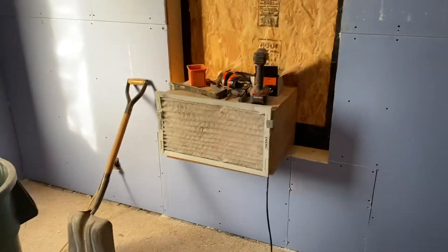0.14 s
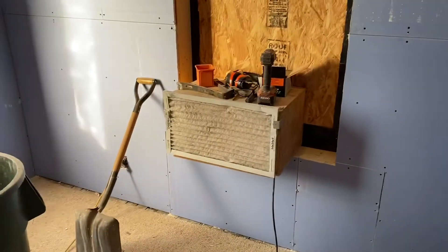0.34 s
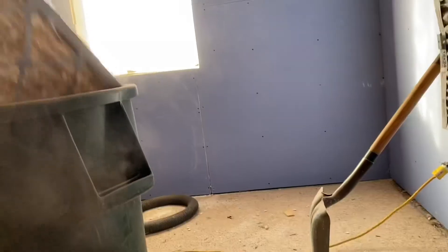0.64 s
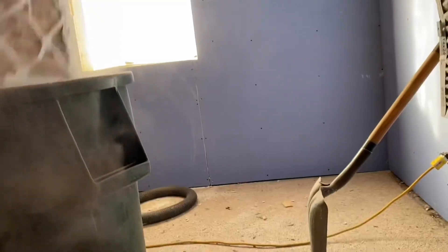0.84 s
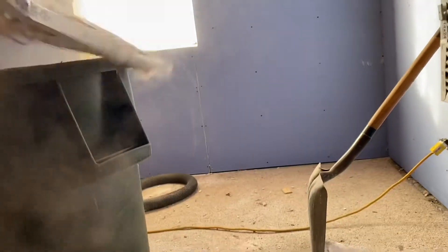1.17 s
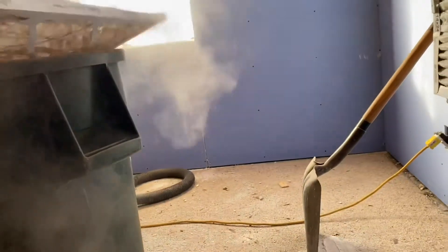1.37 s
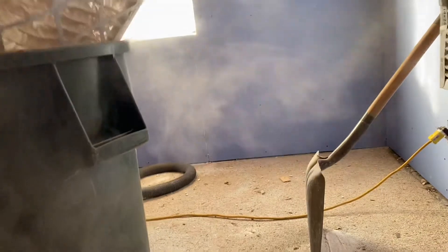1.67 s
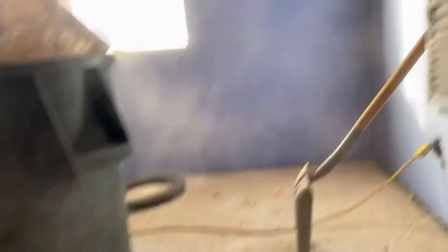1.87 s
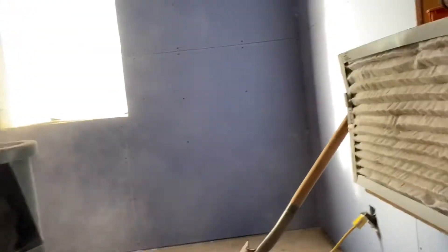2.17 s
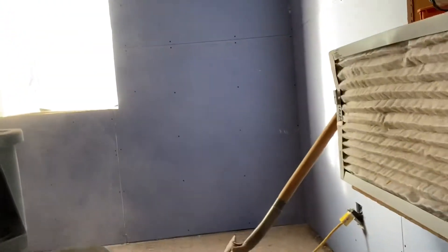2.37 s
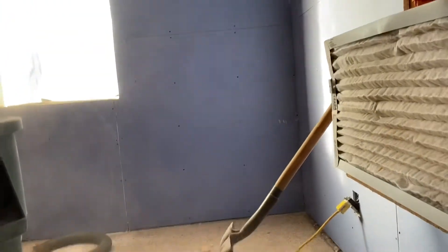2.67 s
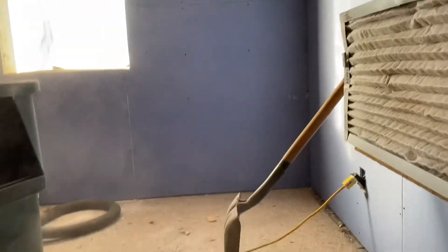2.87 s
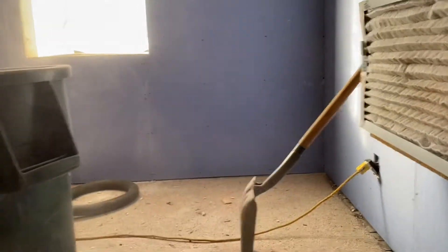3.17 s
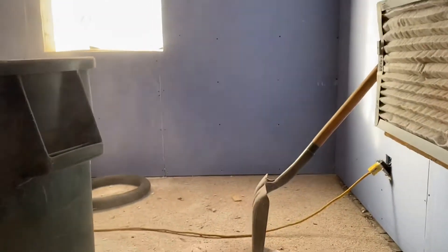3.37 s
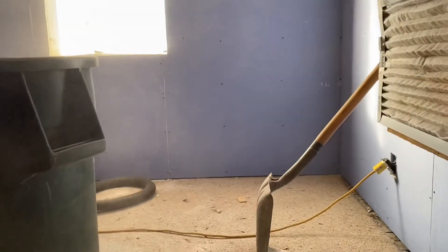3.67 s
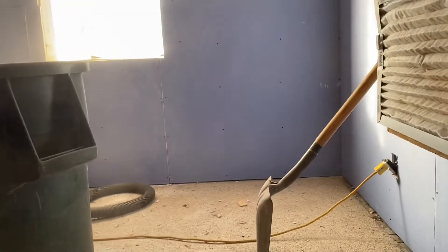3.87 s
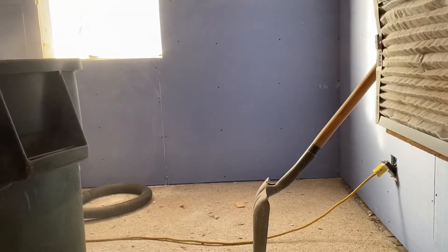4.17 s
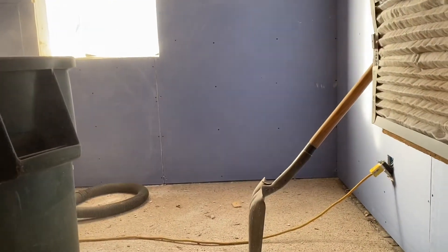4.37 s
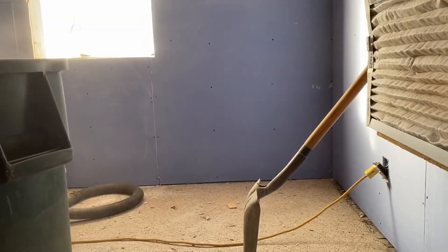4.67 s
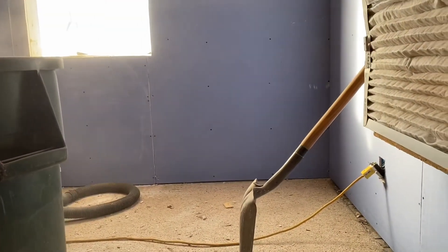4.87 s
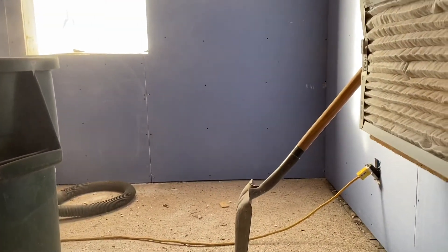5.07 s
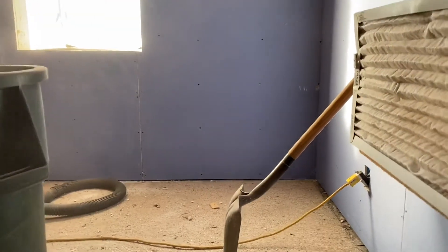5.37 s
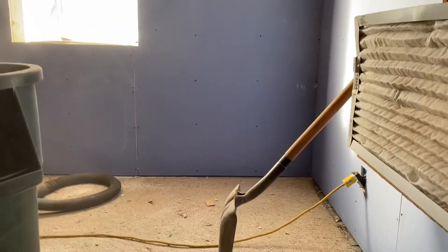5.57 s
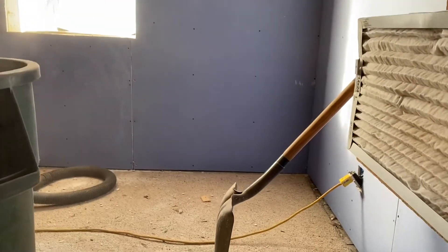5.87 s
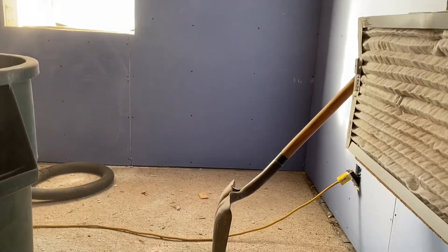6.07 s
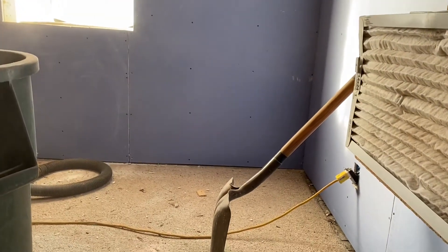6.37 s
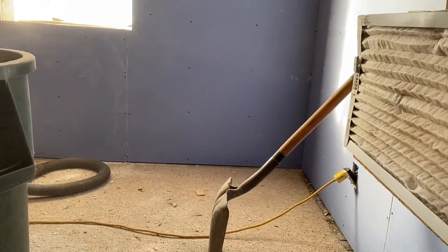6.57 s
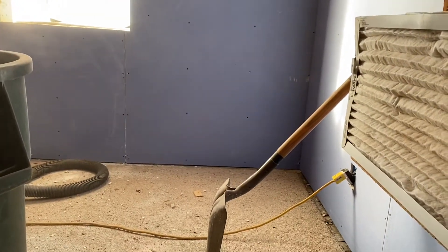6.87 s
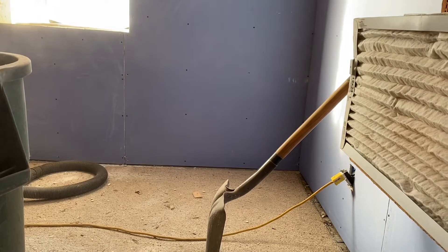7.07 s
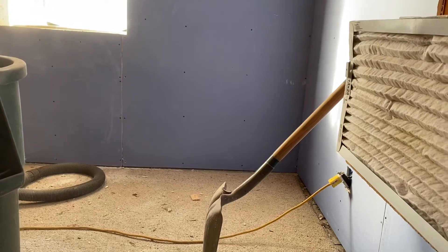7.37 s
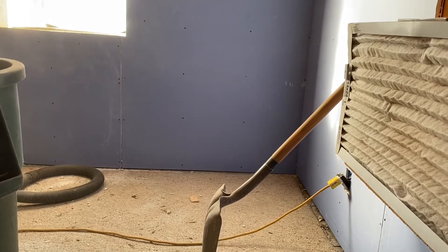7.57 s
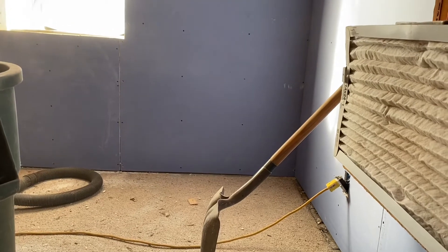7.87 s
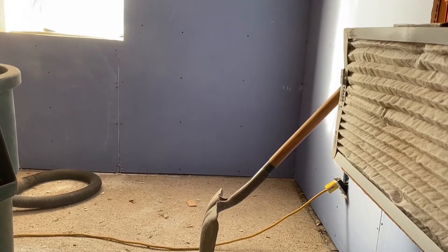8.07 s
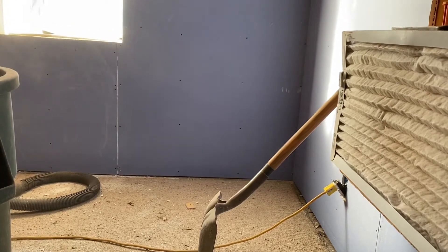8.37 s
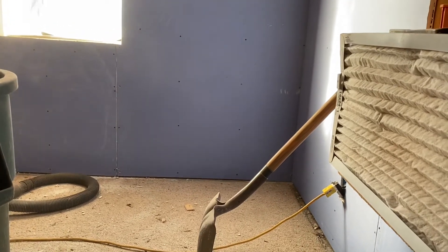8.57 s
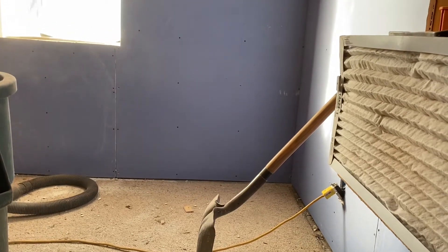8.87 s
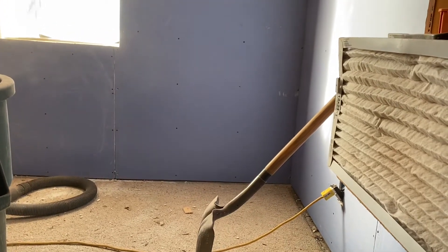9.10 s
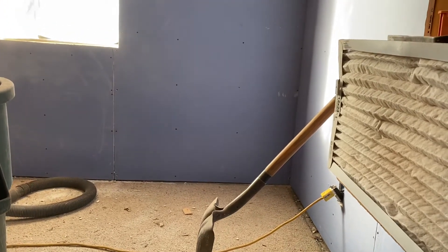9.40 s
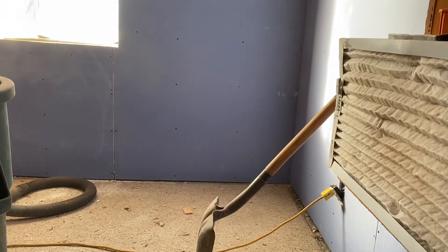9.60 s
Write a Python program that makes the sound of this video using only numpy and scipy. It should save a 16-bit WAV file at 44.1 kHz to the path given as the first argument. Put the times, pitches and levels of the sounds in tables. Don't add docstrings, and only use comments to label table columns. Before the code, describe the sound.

A motorised fan draws air through a pleated filter indoors. Its whine firms up and climbs a little, swelling and dipping, then everything fades out and straight back in. From beside the machine, a dense, steady rush continues with a high whine near 950 hertz and faint motor hum. Small hand-held microphone movements shift the stereo colour; one soft low bump occurs early.

```python
import sys
import numpy as np
from scipy import signal
from scipy.fft import rfft, irfft, next_fast_len
from scipy.io import wavfile

SR = 44100
rng = np.random.default_rng(int(sys.argv[2]) if len(sys.argv) > 2 else 0)


def undo_db(level):
    steps = np.asarray(level, float) / 20
    return 10 ** steps


def pcm_store(signal):
    levels = np.round(np.clip(np.atleast_2d(signal), -1, 1) * 32767)
    wavfile.write(sys.argv[1], SR, levels.astype(np.int16).T)


N = 429534
CUT_S = .5722


def in_time(rows, t):
    s, *columns = np.transpose(rows)
    return np.array([np.interp(t, s, c) for c in columns])


def drift(rate_hz, count, step_s):
    r = np.exp(-2 * np.pi * rate_hz * step_s)
    steps = int(N / SR / step_s) + 8
    settle = 500
    noise = rng.standard_normal((count, steps + settle))
    slow = signal.lfilter([1], [1, -2 * r, r * r], noise)[:, settle:]
    return slow / slow.std(axis=1, keepdims=True)


def room_ripple(hz, depth_db, width_hz, turn_rad):
    knots = rng.standard_normal((4, int(SR / 2 / width_hz) + 2))
    common, left, right, twist = (np.interp(hz / width_hz, np.arange(len(k)), k) for k in knots)
    reach = np.clip(2 - hz / 3500, 0, 1) * np.clip(hz / 900, 0, 1)
    level_db = depth_db * reach * (common + 0.37 * np.array([left, right]))
    return undo_db(level_db) * np.exp(.5j * turn_rad * reach * twist * [[1], [-1]])


def coloured_pair(spectrum, modes, pair, count=N):
    port_hz, port_turn_hz, port_likeness = 6930, 4110, 0.95
    top_hz = 15750
    size = next_fast_len(count)
    hz = np.fft.rfftfreq(size, 1 / SR) + 1e-3

    spectrum_hz, spectrum_db = np.transpose(spectrum)
    colour_db = np.interp(np.log(hz), np.log(spectrum_hz), spectrum_db)
    for centre_hz, width_hz, peak_db in modes:
        colour_db += peak_db / (1 + (2 * (hz - centre_hz) / width_hz) ** 2)

    alike, lead, balance_db = in_time(list(pair) + [(port_hz, port_likeness, 0, 0)], hz)
    alike = np.clip(alike + 0.064, 0, port_likeness)
    lead = lead - 2 * np.pi * np.maximum(hz - port_hz, 0) / port_turn_hz

    common, own = rfft(rng.standard_normal((2, size), dtype=np.float32))
    shared_part = np.sqrt(1 + alike) * common
    own_part = np.sqrt(1 - alike) * own
    left = (shared_part + own_part) * undo_db(balance_db / 2) * np.exp(.5j * lead)
    right = (shared_part - own_part) * undo_db(-balance_db / 2) * np.exp(-.5j * lead)

    gain = undo_db(colour_db) * room_ripple(hz, depth_db=2.5, width_hz=16.0, turn_rad=0.63) * (hz < top_hz)
    out = irfft(gain * np.array([left, right]), size)[:, :count]
    return out / np.sqrt(np.mean(out ** 2))


def rush(noise, nearness, gust_db, patch_db):
    hz, t, frames = signal.stft(noise, SR, nperseg=512)
    step_s = t[1] - t[0]
    near_db, pan_db = in_time(nearness, t)
    level_db = np.clip((hz[:, None] - 150) / (600 - 150), 0, 1) * near_db

    gust = 0.59 * drift(4.2, count=1, step_s=step_s) + 1.46 * drift(25.0, count=1, step_s=step_s)
    patch_of_bin = np.minimum((4 * np.log2(hz / 300 + 1)).astype(int), 23)
    patches = drift(7.0, count=24, step_s=step_s)[patch_of_bin]
    brightness = np.clip(np.log2(hz / 400 + 1) / 4.6, 0, 1)[:, None]
    level_db += brightness * gust_db * gust[:, :len(t)]
    level_db += (0.64 + 0.36 * brightness) * patch_db * patches[:, :len(t)]

    turned_db = np.clip(hz / 2500, 0, 1)[:, None] * (hz[:, None] < 5000) * pan_db / 2
    frames = frames * undo_db(level_db + np.array([turned_db, -turned_db]))
    return signal.istft(frames, SR, nperseg=512)[1][:, :N]


def front_air():
    # hz, density_db (per Hz)
    front_spectrum = [(25, -31), (60, -16), (85, -6.5), (200, -3.5), (650, -4), (1050, 5.5), (1200, -6),
                      (2000, -7.5), (3000, -15), (4500, -23), (8000, -28.5), (10200, -32), (12500, -36.5),
                      (15700, -40)]
    # centre_hz, width_hz, peak_db
    front_modes = [(150, 30, 4.5), (213, 43, -3), (275, 37, 6), (305, 54, 1.5), (340, 37, 5.5),
                   (445, 39, 3.5), (627, 110, 6.5), (720, 86, -8.5), (1080, 120, -13.5), (1390, 50, 2),
                   (2080, 200, -2), (2287, 30, 9), (2580, 22, 4), (4020, 100, 0)]
    # hz, likeness (0-1), left_lead_rad, left_minus_right_db
    front_pair = [(60, 0.96, -0.1, -1), (200, 0.94, -0.1, 0), (350, 0.85, -0.2, -1.5), (550, 0.3, -0.1, 3),
                  (800, 0.43, -0.1, 0), (1150, 0.24, 0.3, -2), (1510, 0, 0.3, -2), (1750, 0.15, 0.27, -1.7),
                  (2200, 0.9, -0.0, 2), (2650, 0.7, 0.0, -1), (3200, 0.71, 0.3, 1), (4000, 0.73, 0.3, -0.0),
                  (4800, 0.9, 0.2, 1.4), (5600, 0.2, 0.0, 1.7)]
    noise = coloured_pair(front_spectrum, front_modes, front_pair, count=SR)
    return undo_db(-20) * rush(noise, [(0, 0, 0)], gust_db=0.6, patch_db=0.5)


def beside_air(away):
    # hz, density_db (per Hz)
    beside_spectrum = [(25, -37), (42, -19), (80, -12.5), (200, -7), (650, 1), (1050, -9.5), (1200, -6.5),
                       (2000, -7), (3000, -21), (4500, -26.5), (8000, -29.5), (10200, -33.5),
                       (12500, -40.5), (15700, -41)]
    # centre_hz, width_hz, peak_db
    beside_modes = [(82.5, 16, 4), (91.6, 18, 6), (114.7, 14, -5.5), (116.5, 22.7, 12), (135, 16, 6.5),
                    (184, 7.6, -8.5), (197.6, 11, 5.5), (223.3, 12.6, 6), (283, 16, 4.5), (304, 29, -4.5),
                    (347.5, 22, 4.5), (370.5, 10.5, -6), (400, 16, -1.5), (436, 21, 3.5), (446.6, 12, -4.5),
                    (520, 103, -7), (528, 60, 2), (804, 13, 1.5), (867, 78, -5), (1002, 233, 7.5),
                    (1146, 136, -7), (1530, 200, 1.96), (1560, 57, -12), (1845, 120, -8), (2064, 104, -8.5),
                    (2407, 97, -3.5), (2715, 120, -3.5), (2890, 120, 2.5), (3180, 220, 2), (8300, 470, -2)]
    # hz, likeness (0-1), left_lead_rad, left_minus_right_db
    away_pair = [(60, 0.99, -0.5, -4), (200, 1, 0.5, 1), (350, 0.59, -0.1, 0), (550, 0.49, -1.5, -2),
                 (800, 0.71, -1.2, -1.5), (1150, 0.33, 1, -1), (1510, 0.61, -2, 1), (1700, 1, -2.5, -1),
                 (2200, 0.25, 1, 3.3), (2650, 0.68, 1.1, 7), (3200, 0.66, 1.0, 5), (4000, 0.74, 0.2, 0.5),
                 (4800, 0.57, 0.2, 3), (5600, 0.2, 2.5, 1)]
    facing_pair = [(60, 1, 0.16, -1), (200, 0.87, -0.38, -0.5), (350, 0.81, -0.35, -1),
                   (550, 0.72, -1.04, -2), (800, 0.78, -0.78, -4.5), (1150, 0.73, -0.61, -4),
                   (1520, 0.58, -1.3, 2), (1750, 0.51, -0.75, -0.5), (2230, 0.51, 0.72, 3.5),
                   (2650, 0.44, 0.98, 6.5), (3200, 0.53, 0.99, 4.5), (4000, 0.55, 0.5, 2.5),
                   (4800, 0.7, 0.5, 0.9), (5600, 0.41, 0.1, -0.5)]
    # time_s, level_db, left_minus_right_db
    hand_nearness = [
        (.6, .4, -0.5),
        (1.2, 0.5, -1),
        (1.7, 0.1, -0.5),
        (2.7, -0.1, 0.5),
        (3.55, -1.2, -.3),
        (4.2, -0.7, -0.3),
        (5.9, 0.4, 1),
        (9.74, 0.36, 1.5),
    ]
    turning = np.sqrt(away) * coloured_pair(beside_spectrum, beside_modes, away_pair)
    turning += np.sqrt(1 - away) * coloured_pair(beside_spectrum, beside_modes, facing_pair)
    return undo_db(-24) * rush(turning, hand_nearness, gust_db=0.38, patch_db=0.7)


def tone(phase, left_db, right_db, lead, waver_db):
    unsettled = [3.5, 2.2, 1.8, 1]
    step_s = .004
    t = np.arange(N) / SR
    strength, slip = (np.interp(t / step_s, np.arange(len(v)), v) for v in drift(12.3, count=2, step_s=step_s))
    waver_db = waver_db * np.interp(t, [0, .2, CUT_S, CUT_S], unsettled)
    phase = phase + .12 * waver_db * slip + rng.uniform(0, 2 * np.pi)
    gain = np.sqrt(2) * undo_db(waver_db * strength - .12 * waver_db ** 2)
    left = undo_db(left_db) * np.sin(phase + lead / 2)
    right = undo_db(right_db) * np.sin(phase - lead / 2)
    return gain * np.array([left, right])


def rotor(t, front, away):
    # time_s, left_db, right_db
    front_whine = [
        (0, -32.4, -24),
        (.08, -28.6, -27),
        (.13, -24, -21),
        (.17, -27, -25),
        (.24, -18.7, -18.5),
        (.32, -26.1, -17),
        (.4, -22.5, -22),
        (.48, -18.8, -17.9),
        (.57, -19, -19),
    ]
    # time_s, left_db, right_db, left_lead_rad
    beside_whine = [(.62, -30, -19, -.3), (1.25, -26.5, -16, -.5), (2.1, -22.1, -18.6, -0.76),
                    (2.75, -21, -18.9, -1.17), (3.6, -22.6, -22.5, -1.25), (3.95, -23.1, -19, -1.6),
                    (4.8, -24, -18, -1.5), (5.45, -25.8, -20, -.9), (6.2, -27.5, -24.3, -0.66),
                    (8.1, -27.6, -23.5, -0.67), (9.74, -27.9, -25.2, -0.38)]
    # time_s, left_db, right_db, left_lead_rad
    beside_overtone = [(.62, -42, -42, -1.6), (1.55, -40.5, -38.2, -1.8), (1.9, -40, -41, .3),
                       (2.15, -38.2, -39.4, 2.8), (2.7, -37, -42.5, 3.8), (3.0, -37.6, -45, 5.1),
                       (3.4, -39.8, -40.5, 5.0), (3.95, -38.5, -38.3, 5.4), (5.05, -38, -39.8, 6.4),
                       (5.7, -40.4, -46.4, 10.6), (6.4, -44, -47.6, 11), (7.3, -39.2, -44, 10.9),
                       (8.45, -36.3, -42.6, 10.9), (9.74, -36.2, -41.8, 11.1)]
    # shaft_multiple, front_db, beside_left_db, beside_right_db, left_lead_rad, waver_db
    shaft_tones = [
        (1, -43.5, -38.7, -37.2, -.1, .35),
        (6, -35, -43, -34.5, .2, 2.4),
        (12, -34, -43, -37, -.6, 2.6),
        (24, -44, -51, -50, -.7, 2.0),
        (54, -46, -50.5, -60, 1.2, 2.0),
        (72, -54, -56, -66, .6, 1.5),
        (90, -60, -68, -70, .5, 1.5),
        (108, -64, -70, -72, .1, 1.5),
    ]
    front_lead = -.2

    spin_up = 52.75 - 2.65 * np.exp(-t / .23)
    running = 52.46 - .009 * t
    angle = 2 * np.pi * np.cumsum(np.where(front, spin_up, running)) / SR
    opening_swell = undo_db(np.interp(t, [.08, .22], [-6, 0]))

    whine = np.where(front, [*in_time(front_whine, t), front_lead + 0 * t], in_time(beside_whine, t))
    overtone = np.where(front, np.c_[[-34, -31.5, front_lead]], in_time(beside_overtone, t))
    out = opening_swell * tone(18 * angle, *whine, waver_db=0.48)
    out += undo_db(.2) * np.sqrt(opening_swell) * tone(36 * angle, *overtone, waver_db=.8)
    for multiple, front_db, left_db, right_db, lead, waver_db in shaft_tones:
        right_db = right_db + 13.0 * away * (multiple > 50)
        left_now_db = np.where(front, front_db, left_db)
        right_now_db = np.where(front, front_db, right_db)
        partial = tone(multiple * angle, left_now_db, right_now_db, lead * ~front, waver_db)
        out += opening_swell ** (multiple == 1) * partial
    return out


def motor_hum(t):
    return tone(2 * np.pi * 119.2 * t, left_db=-43, right_db=-41.5, lead=-.2, waver_db=0.0)


def handling(t):
    # time_s, peak_db
    finger_bumps = [
        (1.59, -37),
    ]
    push = np.zeros(len(t))
    for time_s, peak_db in finger_bumps:
        since = t - time_s
        push += undo_db(peak_db) * np.exp(-(since / 0.025) ** 2) * np.sin(2 * np.pi * 33 * since)
    return push


def scene():
    # time_s, share_turned_away
    hand_turn = [
        (.57, 1),
        (1.8, 1),
        (2.2, 0),
        (9.74, 0),
    ]
    silent_s, fade_out_s, fade_in_s = .0005, .031, .032
    t = np.arange(N) / SR
    front = t < CUT_S
    away = in_time(hand_turn, t)[0]

    air = np.hstack([front_air()[:, :front.sum()], beside_air(away)[:, ~front]])
    mix = air + rotor(t, front, away) + motor_hum(t) + handling(t)

    fade_out = (CUT_S - silent_s - t) / fade_out_s
    fade_in = (t - CUT_S - silent_s) / fade_in_s
    fade = np.clip(np.where(front, fade_out, fade_in), 0, 1)
    fade *= np.minimum((N / SR - t) / .002, 1)
    fade *= np.minimum(t / 0.0015, 1)
    return fade * mix


def roll_off(x):
    return signal.sosfilt(signal.butter(12, 17030, fs=SR, output="sos"), x)


def record(dry):
    return roll_off(dry)


dry = scene()
out = record(dry)
pcm_store(out)
```